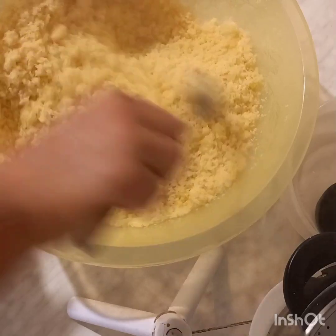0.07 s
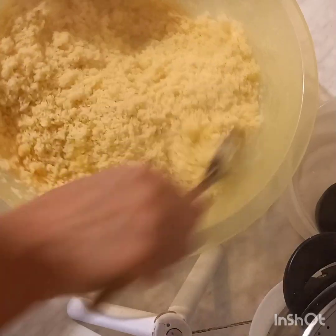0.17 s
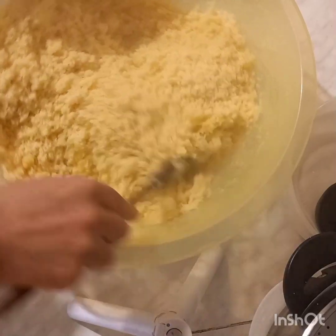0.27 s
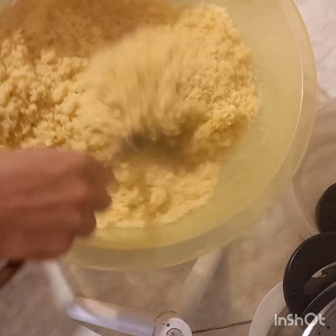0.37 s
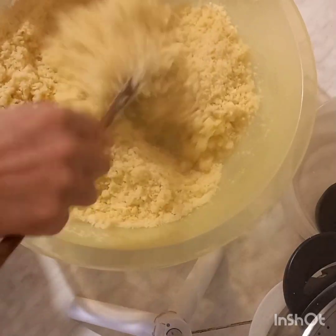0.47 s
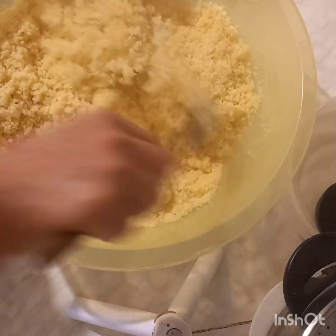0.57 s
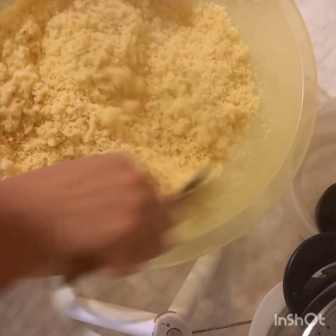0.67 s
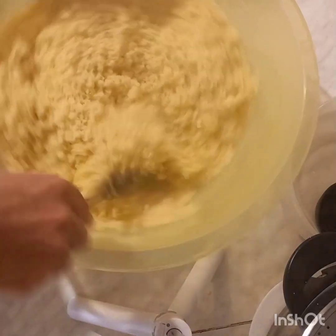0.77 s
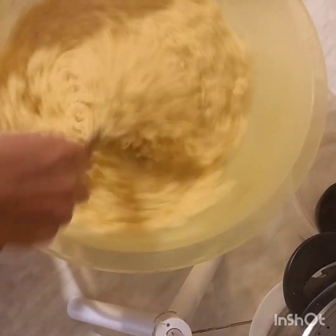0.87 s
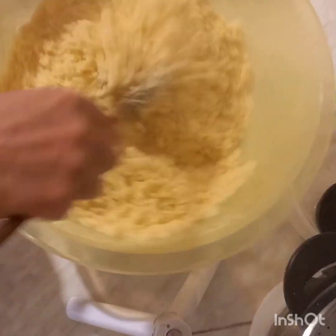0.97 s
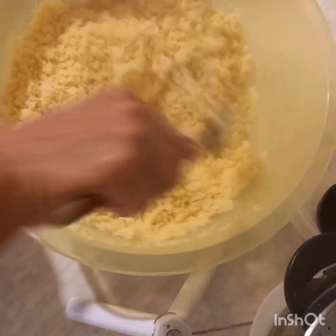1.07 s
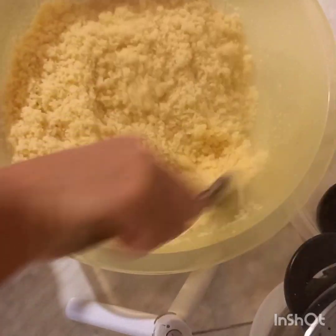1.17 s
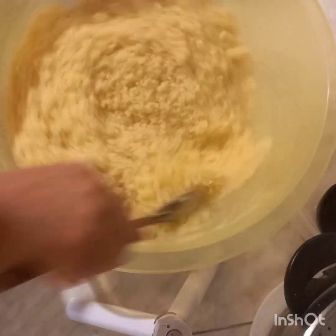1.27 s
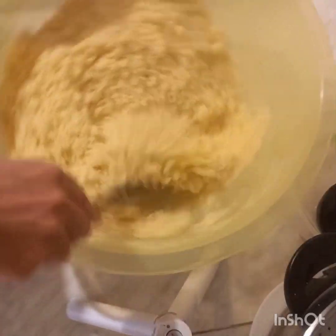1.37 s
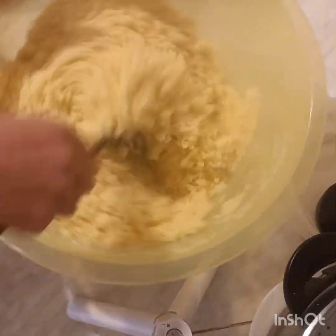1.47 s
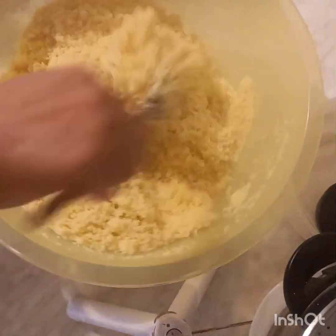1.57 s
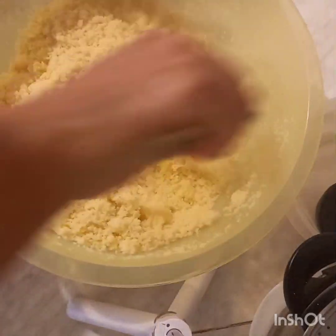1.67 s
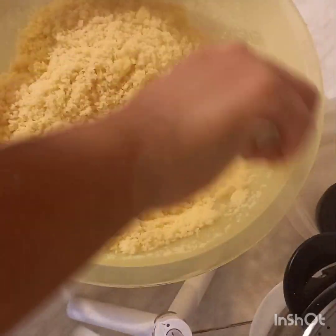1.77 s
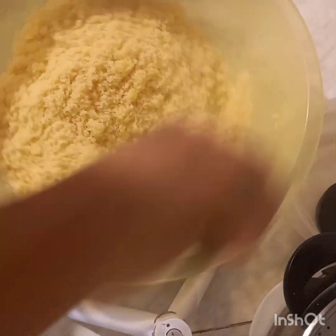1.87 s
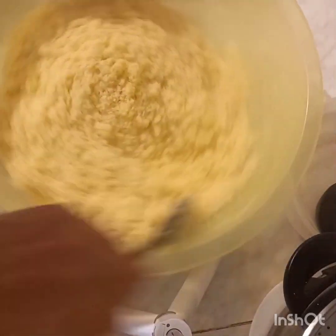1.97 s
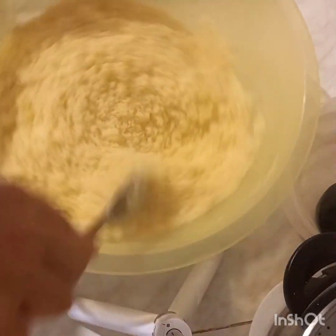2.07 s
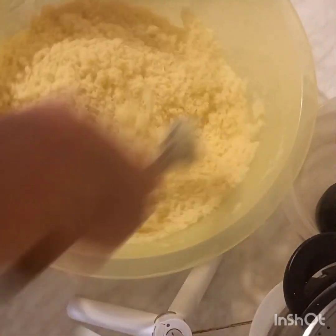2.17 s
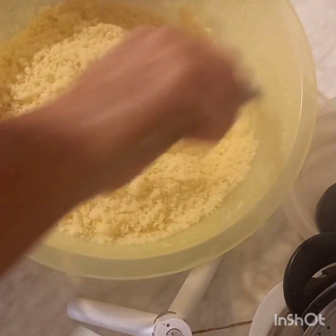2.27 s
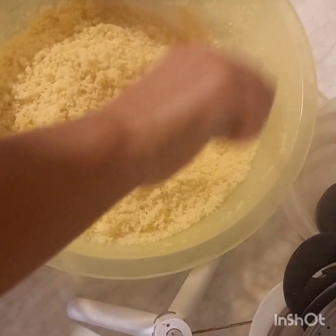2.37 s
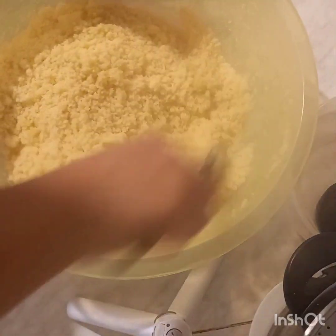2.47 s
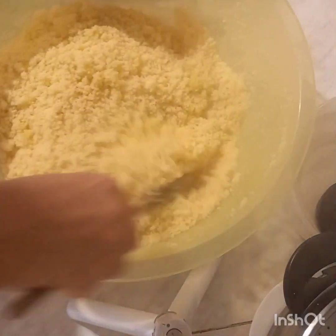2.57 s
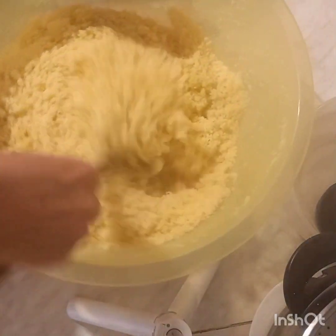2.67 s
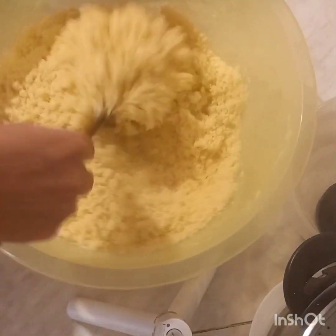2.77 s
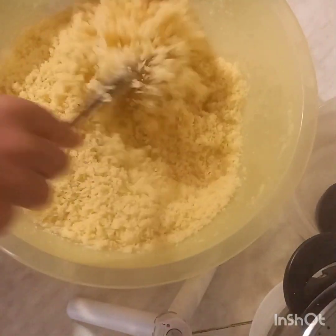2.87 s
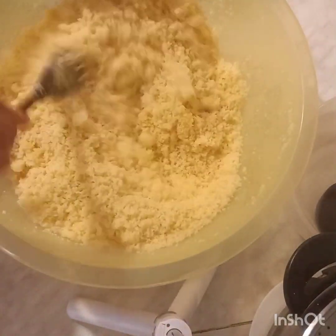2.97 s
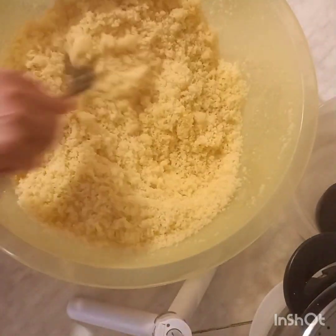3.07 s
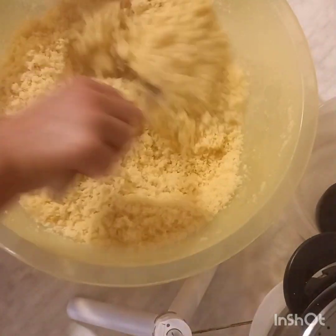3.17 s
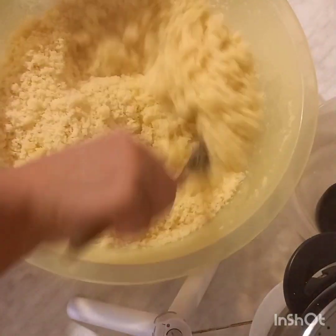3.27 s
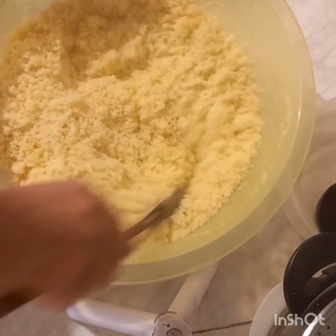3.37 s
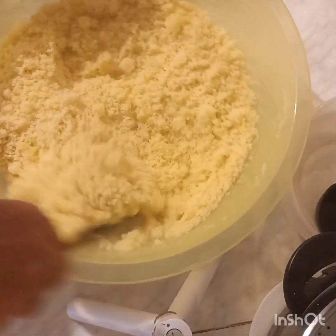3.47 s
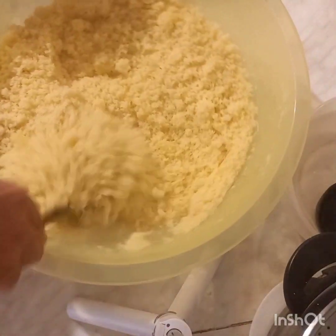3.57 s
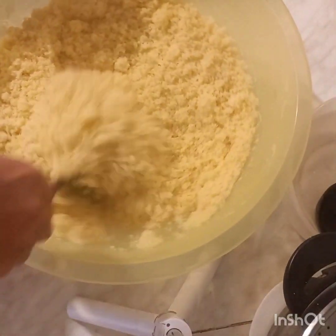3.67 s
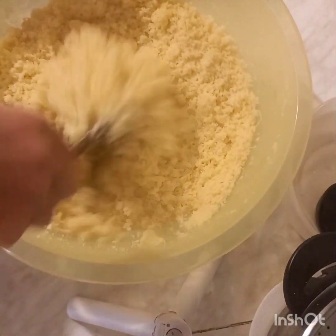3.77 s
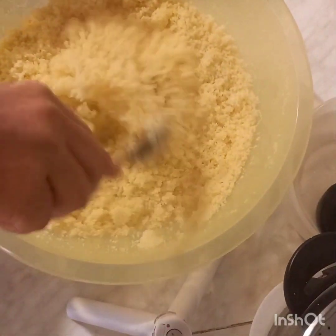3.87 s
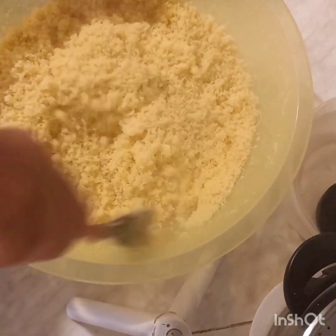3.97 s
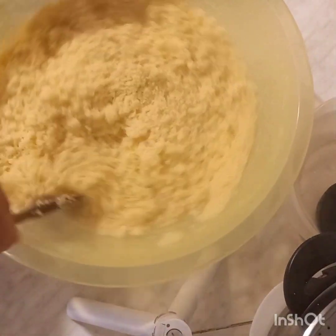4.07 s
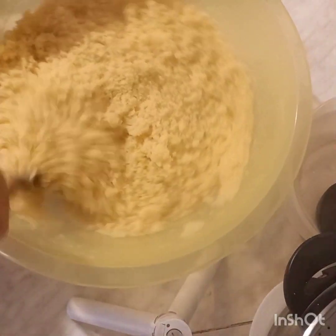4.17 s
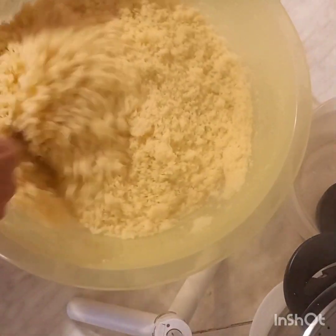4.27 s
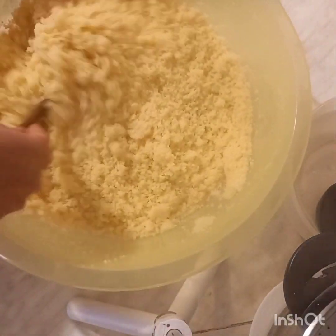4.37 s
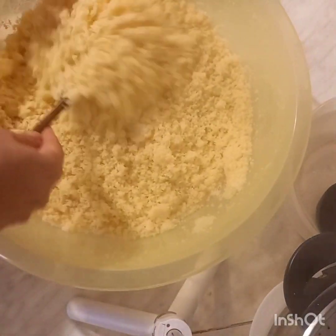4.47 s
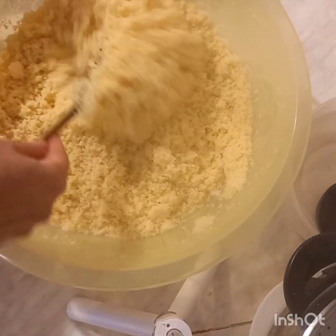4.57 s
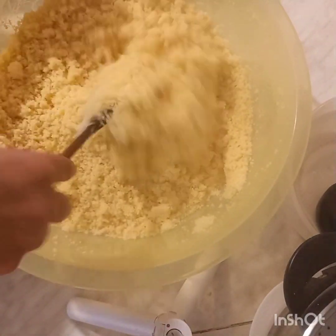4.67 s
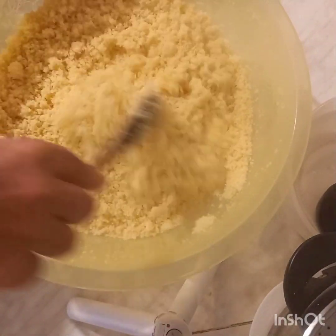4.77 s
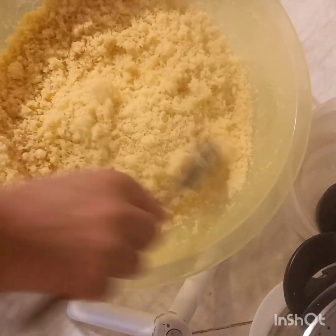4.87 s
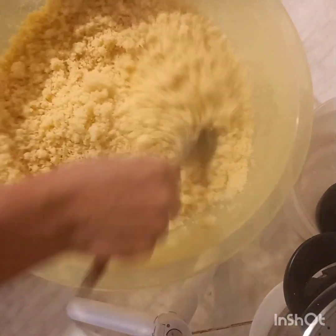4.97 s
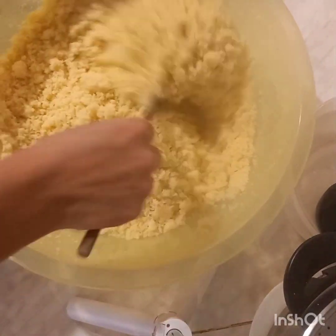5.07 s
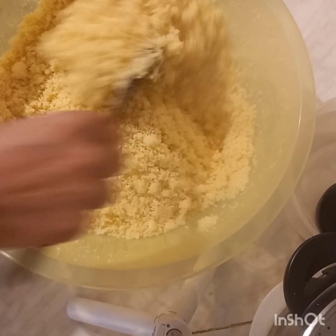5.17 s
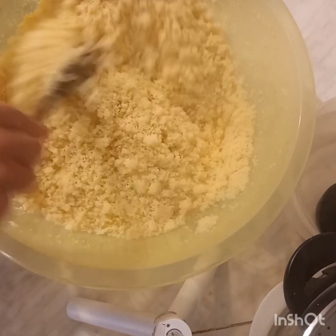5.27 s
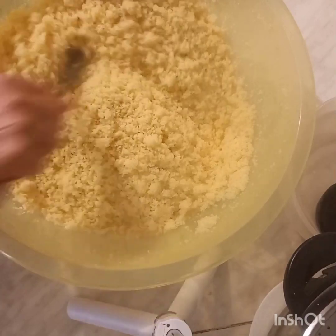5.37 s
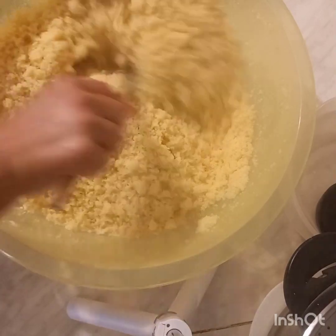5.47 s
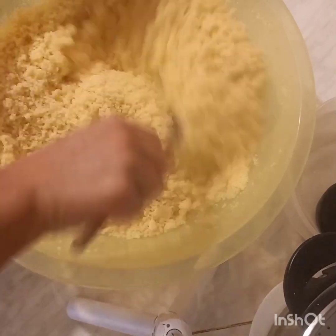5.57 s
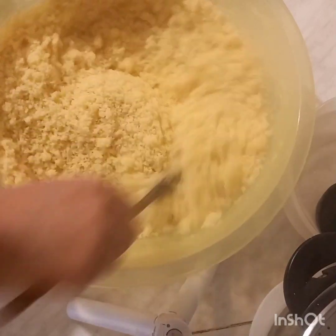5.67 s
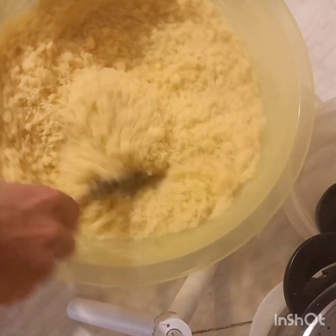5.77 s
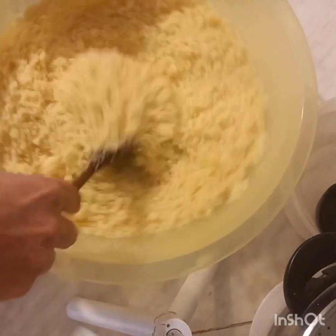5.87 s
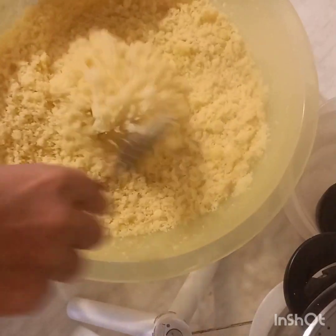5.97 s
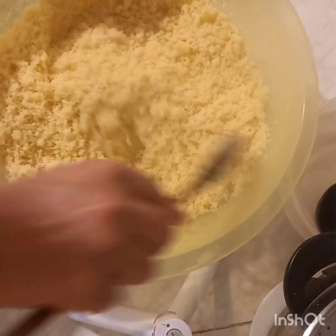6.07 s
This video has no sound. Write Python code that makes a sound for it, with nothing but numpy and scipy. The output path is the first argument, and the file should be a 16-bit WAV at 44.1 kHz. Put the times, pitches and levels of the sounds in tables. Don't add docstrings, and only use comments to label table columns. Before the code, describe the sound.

A wooden spoon stirs dry couscous in a thin plastic bowl, grains scraping and hissing in quick swishes, with hollow knocks and low worktop thumps.

```python
import sys
import numpy as np
from scipy import signal
from scipy.fft import rfft, irfft, next_fast_len
from scipy.io import wavfile
from scipy.ndimage import map_coordinates

SR = 44100
rng = np.random.default_rng(int(sys.argv[2]) if len(sys.argv) > 2 else 0)


def volts_from_decibels(level):
    exponent = np.asarray(level, float) / 20
    return 10 ** exponent


def to_wav(s):
    ch = np.atleast_2d(s).T
    pcm = np.round(np.clip(ch, -1, 1) * 32767)
    wavfile.write(sys.argv[1], SR, pcm.astype(np.int16))


N = 269451

# (pitch [Hz], likeness [0 to 1])
LIKENESS = [(60, 0.99), (200, 0.58), (450, 0.79), (900, 0.34), (2000, 0.036), (5000, 0.155)]
POINTED = 0.24


def unit(x):
    return x / np.sqrt(np.mean(x ** 2) + 1e-20)


def along(points, hz):
    f, v = np.transpose(points)
    return np.interp(np.log(hz + 1), np.log(f + 1), v)


def wobble(rate):
    knots = rng.standard_normal(int(N * rate / SR) + 4)
    return map_coordinates(knots, [np.arange(N) * rate / SR])


def filtered(x, response):
    m = next_fast_len(N + SR // 2)
    return irfft(rfft(x, m) * response(np.fft.rfftfreq(m, 1 / SR)), m)[..., :N]


def peak(f, hz, width_hz):
    return 1j * f * width_hz / (hz * hz - f * f + 1j * f * width_hz)


def mid_side_angle(hz):
    return np.arccos(np.clip(along(LIKENESS, hz), -1, 1)) / 2


def pair(response, spread_db=0., clump_db=0.):
    def mid_and_side(hz):
        angle = mid_side_angle(hz)
        return response(hz) * [np.cos(angle), np.sin(angle)]

    size = volts_from_decibels(spread_db * rng.standard_normal(N) + clump_db * wobble(120))
    mid, side = filtered(size * rng.standard_normal((2, N)), mid_and_side)
    return unit(np.array([mid + side, mid - side]))


def coloured_pair(colour, **grain):
    return pair(lambda f: volts_from_decibels(along(colour, f)), **grain)


def swells(s, rise_s, fall_s, db, edge_db, square, rest_db):
    power = np.full(N, volts_from_decibels(2 * rest_db))
    for at, rise, fall, top in zip(s, rise_s, fall_s, db):
        start = max(round((at - 2 * rise) * SR), 0)
        stop = min(round((at + 2 * fall) * SR), N)
        t = np.arange(start, stop) / SR - at
        away = np.abs(t / np.where(t < 0, rise, fall))
        drop_db = edge_db * (POINTED * away + (1 - POINTED) * away ** square)
        power[start:stop] += volts_from_decibels(2 * (top - drop_db))
    return 10 * np.log10(power)


def ring(t, hz, db, t60, turns):
    t = np.maximum(t, 0)
    build_up = 1 - np.exp(-t * hz / turns)
    return volts_from_decibels(db - 60 * t / t60) * np.sin(2 * np.pi * hz * t) * build_up


def air():
    # (pitch [Hz], level [dB per Hz])
    hum_colour = [(88, -23), (150, 4.5), (182, -16), (376, -14), (637, -6.5), (875, -11.5), (957, -3),
                  (1200, -11), (1700, -17.5), (2440, -11.5), (3150, -41), (3660, -16), (5500, -34),
                  (7150, -76)]
    return volts_from_decibels(-63.5 - 1.0 + .8 * wobble(3.131)) * coloured_pair(hum_colour)


def room(x):
    # (pitch [Hz], time to drop 60 dB [s])
    echo_times = [(100, 0.3), (1000, 0.43), (10000, 0.11)]
    out = np.zeros((2, N + 2 * SR))
    step = SR // 3
    for at in range(0, N, step):
        hz, t, z = signal.stft(rng.standard_normal((2, SR // 2)), SR, nperseg=256)
        angle = mid_side_angle(hz)[:, None]
        mid, side = z[0] * np.cos(angle), z[1] * np.sin(angle)
        fade = volts_from_decibels(-60 * t / along(echo_times, hz)[:, None])
        tail = signal.istft(np.array([mid + side, mid - side]) * fade, SR, nperseg=256)[1]
        echo = signal.fftconvolve(x[:, at:at + step], tail / np.linalg.norm(tail[0]), axes=1)
        out[:, at + 150:][:, :echo.shape[1]] += echo
    return out[:, :N]


def thumps():
    # (time [s], peak level [dB], pitch [Hz], time to drop 60 dB [s])
    landings = [(0.166, -38.5, 113.4, 0.3), (0.652, -33, 116.6, 0.334), (1.205, -27.5, 119, 0.1),
                (1.789, -38.5, 115.5, 0.34), (2.355, -32.5, 115.2, 0.31), (3.113, -41.5, 93.86, 0.61),
                (3.512, -43, 117, 0.16), (4.425, -35.5, 103.6, 0.11), (4.956, -47, 116, 0.46),
                (5.412, -34, 94, 0.11), (5.809, -42, 75.4, 0.13)]
    out, t = np.zeros(N + SR), np.arange(SR // 2) / SR
    for s, db, hz, t60 in landings:
        start = round((s - .002) * SR)
        out[start:][:len(t)] -= ring(t, hz, db + 3, t60, turns=.3)
    return out[:N] * volts_from_decibels([[-.6], [.6]])


def worktop_shiver():
    # (time [s], half length [s], lowest note level [dB], second note level [dB])
    leans = [(.22, .13, -50, -52), (0.334, 0.097, -48.5, -53), (.49, 0.077, -62, -53.5),
             (0.732, 0.1, -43, -49), (0.956, 0.31, -52.5, -59.5), (1.264, 0.22, -49, -48),
             (1.5, 0.19, -59, -55.5), (1.83, 0.1, -45, -51.5), (2.122, .12, -59, -52.5),
             (2.406, .13, -52, -48.5), (2.76, 0.126, -57, -55), (3.159, 0.096, -41, -48),
             (3.505, .07, -54.5, -58), (3.581, .11, -49, -51), (3.84, 0.11, -50, -57.5),
             (4.44, 0.18, -54, -58), (4.65, 0.2, -48.5, -62), (5.06, 0.134, -42, -59.5),
             (5.22, .12, -51.5, -77), (5.367, 0.129, -44, -64), (5.58, 0.16, -50, -57.5),
             (5.838, 0.12, -51, -55.5), (6.11, 0.16, -50, -71.5)]
    s, half_s, low_tops, second_tops = np.transpose(leans)
    lingers = 1.17
    edge_db, square = 20, 1.86
    low_db = swells(s, half_s, lingers * half_s, low_tops, edge_db, square, -63)
    second_db = swells(s, half_s, lingers * half_s, second_tops, edge_db, square, -64.5)
    sway = 1.16 * np.sin(2 * np.pi * np.cumsum(55 + 4 * wobble(9)) / SR)
    rumble = pair(lambda f: peak(f, 59.6, 28) ** 2 + 0.54 * peak(f, 35, 25))
    second = pair(lambda f: peak(f, 111.14, 44) ** 2 + 0.37 * peak(f, 137.3, 25) ** 2)
    return volts_from_decibels(low_db) * (sway + 0.46 * rumble) + volts_from_decibels(second_db) * second


def cracks():
    # (time [s], level [dB], top pitch [Hz])
    hard_contacts = [
        (.164, -48, 2300),
        (.289, -32, 14000),
        (.652, -16.5, 14000),
        (1.2025, -27, 2300),
        (3.507, -31.5, 2100),
        (3.862, -44, 2000),
        (4.981, -42, 5000),
    ]
    # (pitch [Hz], level [dB per Hz])
    crack_colour = [(500, -30), (1800, 0), (3000, -3), (4500, -6), (6500, -12), (11000, -12), (15800, -22)]
    out, t = np.zeros((2, N + SR)), np.arange(SR // 2) / SR
    for s, db, top_hz in hard_contacts:
        soften = signal.butter(4, top_hz, fs=SR, output="sos")
        burst = signal.sosfilt(soften, rng.standard_normal((2, len(t))))
        out[:, round(s * SR):][:, :len(t)] += volts_from_decibels(db - 11.0 - 60 * t / 0.037) * burst
    out = out[:, :N]
    return filtered(out, lambda f: volts_from_decibels(along(crack_colour, f) + 10)) * (np.abs(out) > 0)


def knocks():
    # (time [s], wall level [dB], floor level [dB], rim level [dB], spoon level [dB])
    blows = [(0.164, -36.5, -29, -43.5, -39.5), (0.292, -31, -43.5, -40.5, -51),
             (0.652, -31.5, -23.5, -33.5, -23.5), (1.202, -36.5, -26.5, -40.5, -35.5),
             (1.789, -50, -44.5, -56, -53), (2.353, -41.5, -35.5, -52.5, -40.5),
             (3.108, -43.5, -40.5, -67, -66), (3.507, -30, -65, -34.5, -44.5), (3.86, -46, -55, -54.5, -59),
             (4.426, -43.5, -47, -88, -81), (4.95, -58, -51, -58, -73), (5.416, -35, -42, -47.5, -59)]
    # (pitch [Hz], level [dB], time to drop 60 dB [s])
    wall_notes = [(392, -11, 0.044), (465, -7.5, 0.069), (502, -24.5, 0.14)]
    floor_notes = [(227, 2.5, 0.035), (274.2, -19.5, 0.3)]
    rim_notes = [(663.4, -9.5, 0.11), (776, 2.5, 0.035), (897, -10, 0.058)]
    spoon_notes = [(1023, -6, 0.072), (1166, 2.5, 0.023), (1180, -6, 0.031), (1290, -16.5, 0.045),
                   (1460, -2, 0.035), (2020, 3.5, 0.052), (2370, -8, 0.036)]
    # (time [s], pitch [Hz])
    grip = [
        (.16, 1080),
        (.65, 1000),
        (1.2, 1060),
        (1.8, 950),
        (2.35, 1340),
        (3.1, 1035),
        (3.9, 1150),
        (4.4, 975),
    ]
    parts = (wall_notes, floor_notes, rim_notes, spoon_notes)
    waits_s = (.0012, .0024, .0003, 0)
    out, t = np.zeros((2, N + SR)), np.arange(SR // 2) / SR
    for s, *levels in blows:
        at = round(s * SR)
        clack_hz = np.interp(s, *np.transpose(grip))
        soft = .4 + .03 * max(-32 - max(levels), 0)
        for db, notes_of_part, wait in zip(levels, parts, waits_s):
            for hz, level, t60 in notes_of_part:
                shift, gain, side = rng.standard_normal(3)
                if notes_of_part is spoon_notes:
                    level -= 25 * abs(np.log(hz / clack_hz))
                    level -= 30 * max(np.log(hz / 1500), 0) * (max(levels) < -30)
                tone_db = db + 6 + level + 1.5 * gain
                tone = ring(t - wait, hz * (1 + .01 * shift), tone_db, t60, turns=soft)
                out[:, at:at + len(t)] -= volts_from_decibels([[0.69 * side], [-.8 * side]]) * tone
    return out[:, :N]


def rubbing():
    # (start [s], length [s], pitch [Hz], width [Hz], level [dB])
    rubs = [(1.705, .07, 1200, 400, -58), (2.03, .1, 490, 70, -50), (2.06, .1, 235, 30, -52),
            (2.98, .22, 265, 20, -64), (3.557, .012, 8000, 1800, -62), (3.86, .07, 3850, 900, -66),
            (4.28, .08, 1930, 40, -66), (4.42, .03, 3050, 600, -60.5), (4.948, .07, 300, 220, -56),
            (5.425, .09, 330, 90, -59), (4.64, .16, 3650, 20, -72), (5.34, .065, 1230, 200, -60.5)]
    out = np.zeros((2, N + SR))
    for s, length, hz, width_hz, db in rubs:
        t = np.arange(int(length * SR)) / SR
        knots = rng.standard_normal((2, 400)) + 1.49 * rng.standard_normal((2, 1, 400))
        size = np.array([[map_coordinates(k, [t * width_hz]) for k in part] for part in knots])
        narrow = size[0] * np.sin(2 * np.pi * hz * t) + size[1] * np.cos(2 * np.pi * hz * t)
        swell = np.sin(np.pi * t / length) ** .5
        out[:, round(s * SR):][:, :len(t)] += volts_from_decibels(db) * swell * unit(narrow)
    return out[:, :N]


def stirring():
    # (fastest moment [s], speeding up [s], slowing down [s],
    # wall scrape level [dB], grain hiss over scrape [dB])
    passes = [(.3, .235, 0.23, -52, -10), (.55, 0.1, 0.15, -67.5, -14), (.68, 0.048, 0.087, -55.5, -1.5),
              (0.922, .23, 0.21, -43, -5.5), (1.14, 0.17, 0.13, -56, -4), (1.418, .23, 0.22, -44.5, -3),
              (1.74, 0.09, .14, -63.5, -9), (2.061, 0.2, 0.19, -42.5, -6), (2.43, 0.12, 0.13, -64, -12),
              (2.57, 0.147, 0.11, -57.5, -14), (2.75, 0.204, 0.19, -55.5, -10.5),
              (3.19, 0.107, 0.23, -69.5, -6), (3.32, 0.18, 0.042, -65, -19),
              (3.591, 0.31, 0.19, -54, -10.5), (3.88, .07, .09, -67, 1), (3.99, 0.081, 0.061, -67.5, -5),
              (4.182, 0.14, 0.2, -48, -7), (4.44, 0.12, 0.16, -66.5, -19.5),
              (5.014, 0.059, 0.094, -54, -10), (5.43, .07, 0.078, -69, -10), (5.53, 0.094, .05, -69.5, -18),
              (5.63, .07, 0.123, -74, -20), (5.862, 0.22, .15, -49.5, -8.5)]
    # (pitch [Hz], width [Hz], level [dB], not used: all count equally)
    bowl_notes = [(436, 8.5, -2), (744, 76, 0), (1383, 6.8, -4), (1438, 5.4, -4), (1925, 120, -3),
                  (2786, 18, -5), (3530, 8.3, -7), (4290, 82, -9), (5000, 54, -13)]
    # (pitch [Hz], level [dB per Hz])
    scrape_colour = [(210, -42), (350, -17), (470, -14.5), (770, -4.5), (1120, -8), (2100, -7), (3200, -12),
                     (4700, -18), (6700, -28), (12000, -31.5), (15800, -60)]
    hiss_colour = [(2200, -40), (3200, -8), (4600, -2), (6700, -5), (8300, 0), (11400, 0), (13500, -3),
                   (15000, -8), (15800, -11)]
    push_colour = [(100, -39.5), (170, -26), (235, -1.5), (340, -5.5), (480, 3), (700, -37.5)]

    def wall(f):
        resonances = sum(abs(peak(f, c, w)) for c, w, _ in bowl_notes)
        return volts_from_decibels(along(scrape_colour, f)) * (1 + 0.544 * resonances)

    s, rise_s, fall_s, db, over_db = np.transpose(passes)
    edge_db, square = 22, 2.92
    scrape_db = swells(s, rise_s, fall_s, db, edge_db, square, -75)
    hiss_db = swells(s, rise_s, fall_s, db + over_db, 1.38 * edge_db, square, -78.5)
    push_db = -66 + 0.48 * (scrape_db + 60)
    judder = wobble(22)
    scrape = volts_from_decibels(scrape_db + 4 + 1.25 * judder) * pair(wall, spread_db=4.5, clump_db=1.07)
    bright_db = -6 + 0.9 * (scrape_db + 45)
    scrape += volts_from_decibels(bright_db) * filtered(scrape, lambda f: peak(f, 3530, 2300))
    hiss = volts_from_decibels(hiss_db + .4 * judder) * coloured_pair(hiss_colour, spread_db=2.5, clump_db=.4)
    push = volts_from_decibels(push_db + 0.5 + 1.3 * wobble(28)) * coloured_pair(push_colour, clump_db=0.5)
    return scrape + hiss * volts_from_decibels([[.9], [-.9]]) + push


def scene():
    blows = knocks() + cracks()
    surroundings = air() + volts_from_decibels(-9.5) * room(blows)
    worktop = thumps() + worktop_shiver()
    return surroundings + worktop + blows + rubbing() + stirring()


def low_pass(x):
    return signal.sosfilt(signal.butter(12, 15970, fs=SR, output="sos"), x)


def record(dry):
    # (pitch [Hz], level [dB per Hz])
    self_noise = [(2940, -34), (5000, -28.5), (6330, -12), (8530, -4), (10400, -9), (12200, 0),
                  (15800, -18)]
    ports = np.array([dry[0], np.roll(dry[1], 6)])
    ports = ports + volts_from_decibels(-79.5 - 1.5) * coloured_pair(self_noise)
    mix = filtered(ports, lambda f: (1j * f / (38 + 1j * f)) ** 3 * (f < 15750))
    return low_pass(mix)


dry = scene()
out = record(dry)
to_wav(out)
```